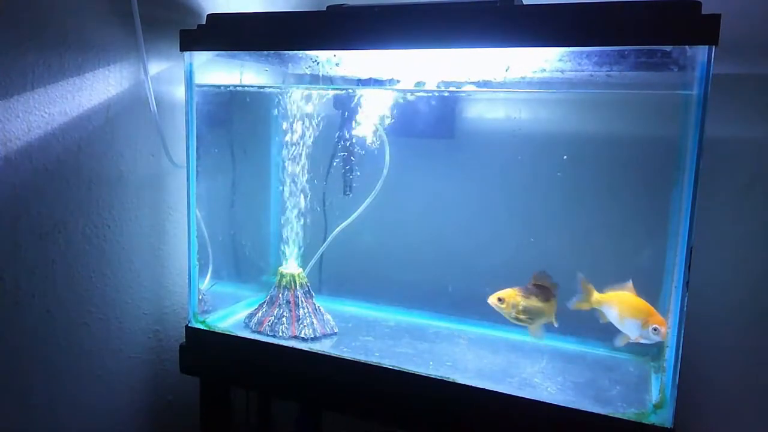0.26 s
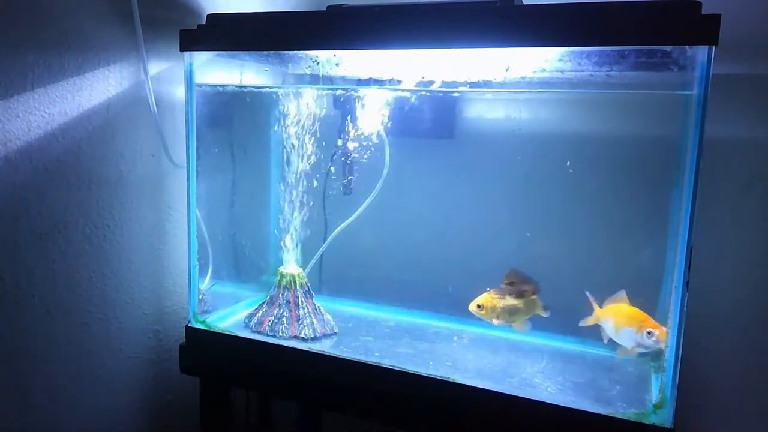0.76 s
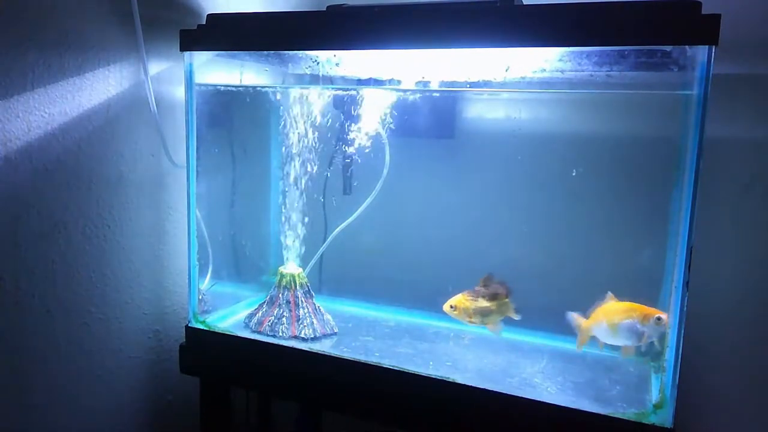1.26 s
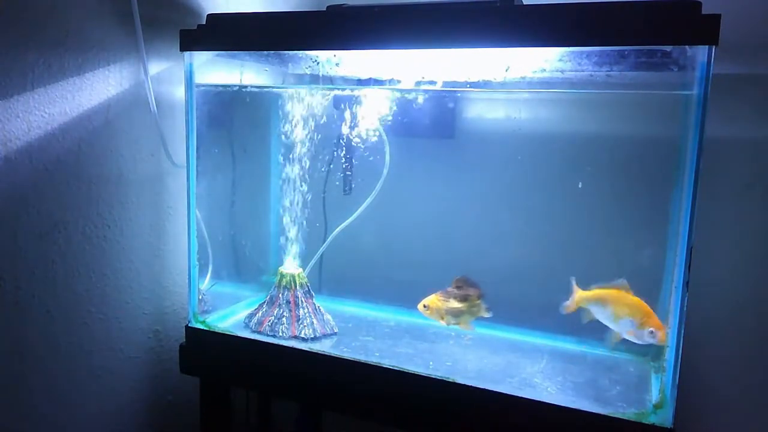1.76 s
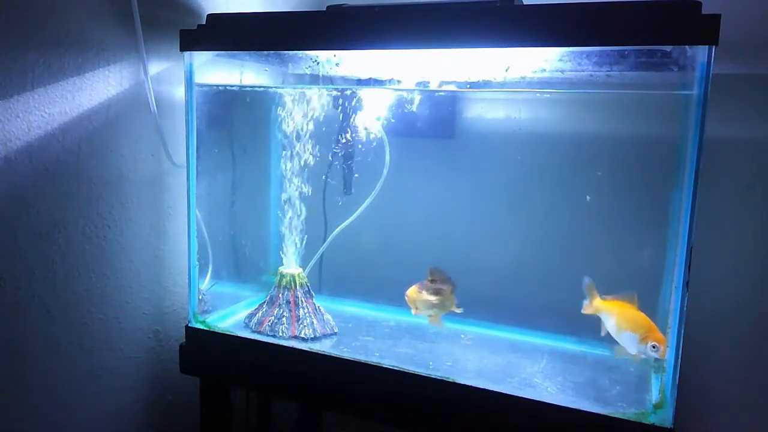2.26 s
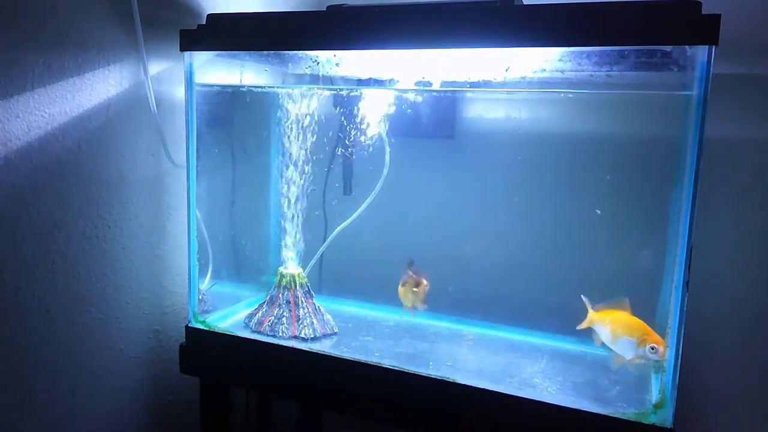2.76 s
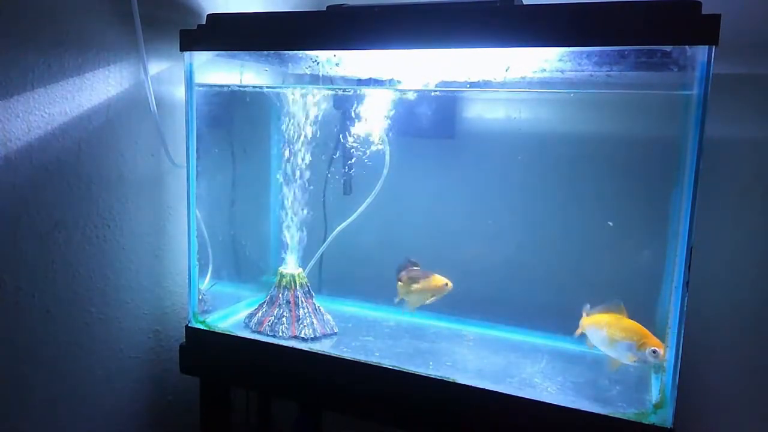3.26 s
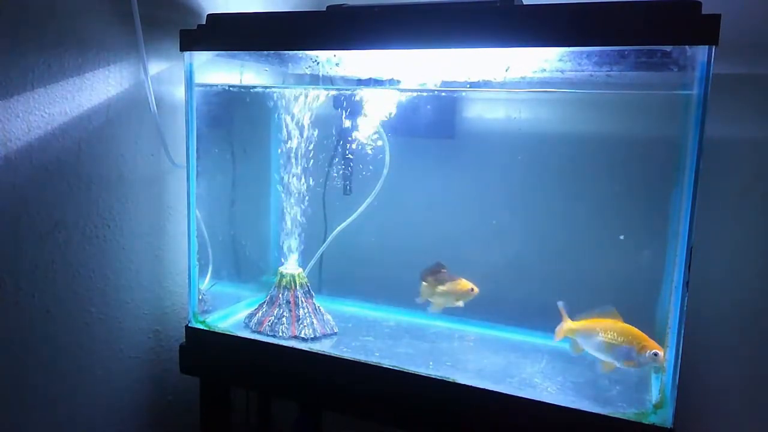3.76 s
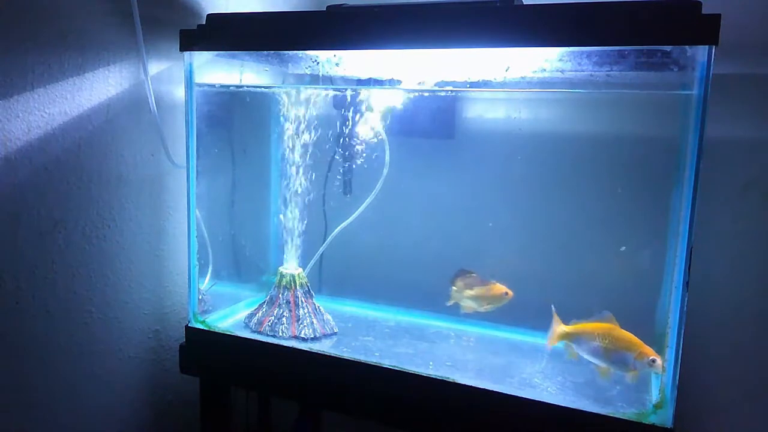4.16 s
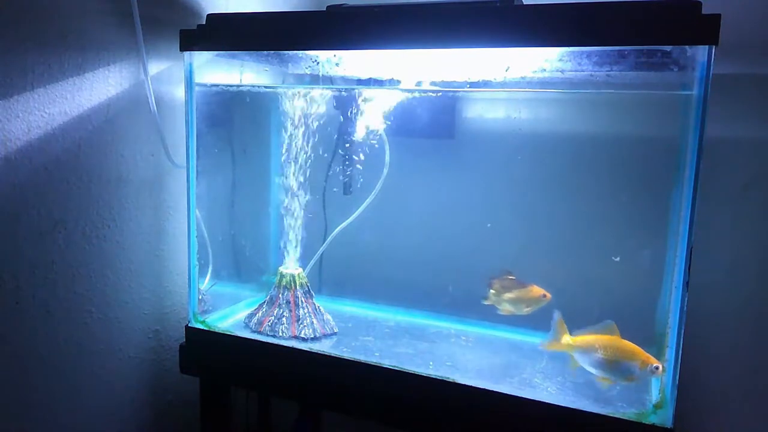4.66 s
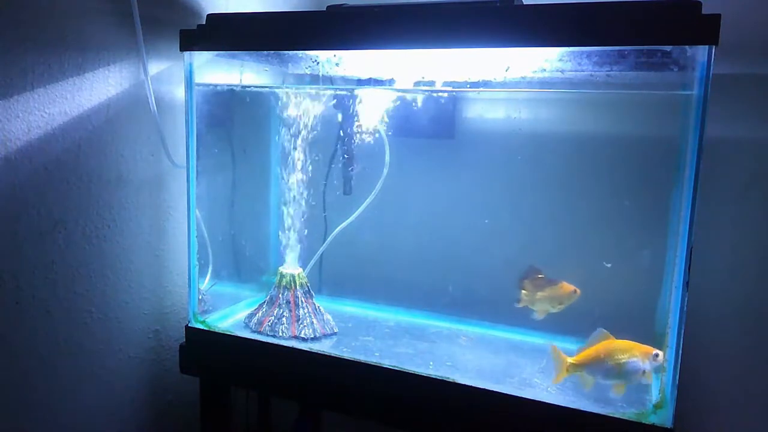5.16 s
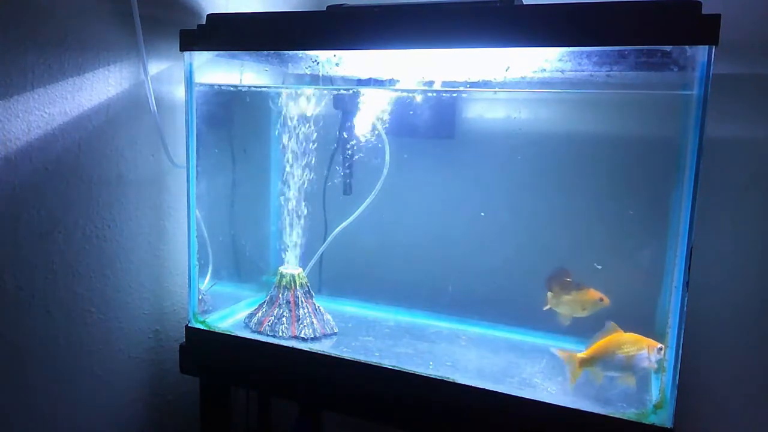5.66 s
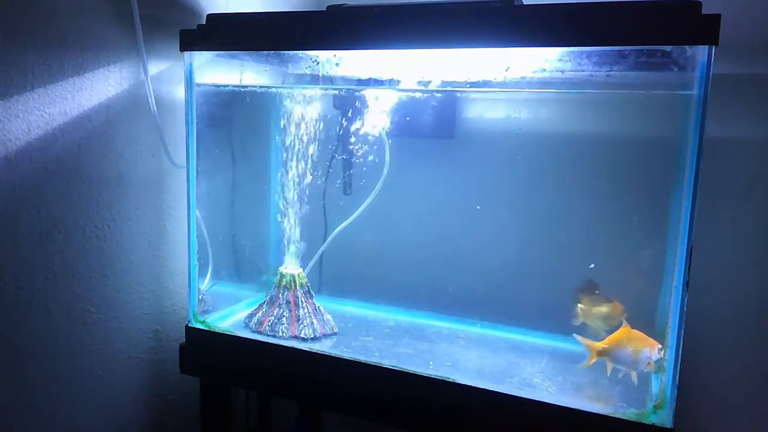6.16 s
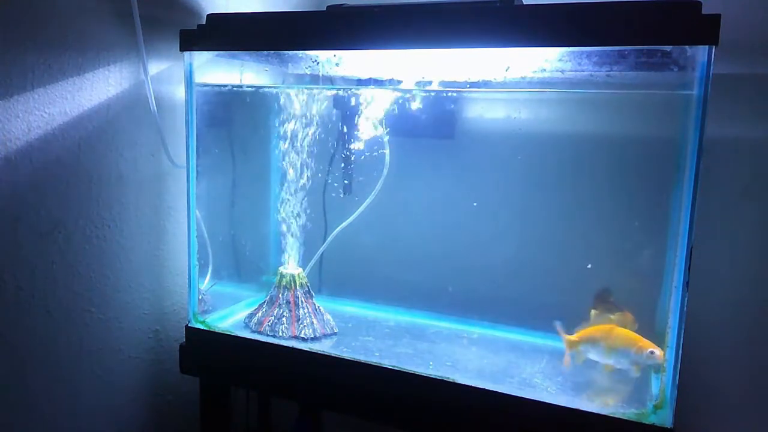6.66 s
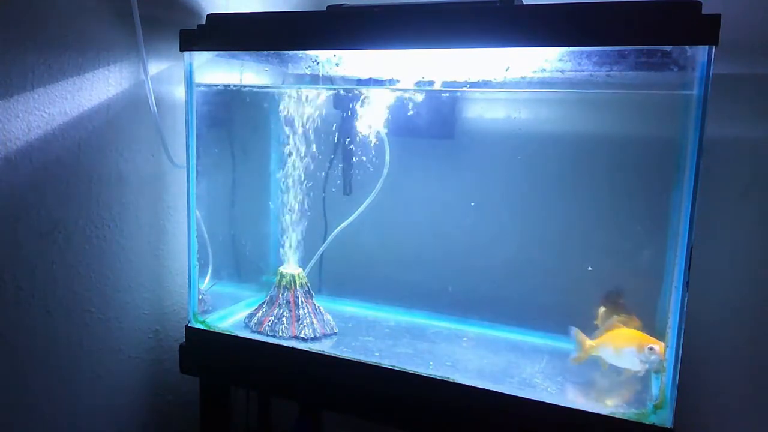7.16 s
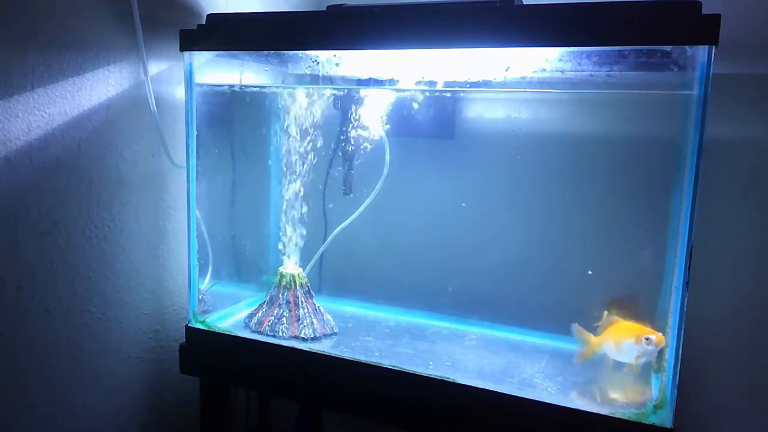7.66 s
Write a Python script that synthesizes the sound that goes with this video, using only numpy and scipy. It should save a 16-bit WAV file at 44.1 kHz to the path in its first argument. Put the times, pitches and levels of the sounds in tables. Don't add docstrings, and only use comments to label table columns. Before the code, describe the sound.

Steady low electric pump hum lies under irregular bubbling from an aquarium. Small watery pops, bright ticks, short hollow knocks near one kilohertz and tiny hissing droplets arrive in bursts separated by calmer gaps, becoming busiest in the last two seconds. Very faint thin whistles of air in the hose slip between them. The place is a quiet room with short echo; the microphone is near the tank, slightly muffled on top.

```python
import sys
import numpy as np
from scipy import signal
from scipy.io import wavfile
from scipy.ndimage import uniform_filter1d

SR = 44100
rng = np.random.default_rng(int(sys.argv[2]) if len(sys.argv) > 2 else 0)


def volts_from_decibels(level):
    exponent = np.asarray(level, float) / 20
    return 10 ** exponent


def dump(signal):
    limited = np.clip(np.atleast_2d(signal).T, -1, 1)
    pcm = np.round(limited * 32767).astype(np.int16)
    wavfile.write(sys.argv[1], SR, pcm)


N = 348213

HUM_OVERTONES = [(1, 1.64), (2, -.98), (3, -.81)]
HUM_LEVELS = [-43.5, -66, -61]
# pitch in Hz, strength in dB per Hz.
RUMBLE_SPECTRUM = [(4, -5.5), (12, 5), (30, -2), (50, 1.5), (75, -6.5), (100, -6), (160, -9.5),
                   (220, -15.5), (300, -58.5)]
# pitch in Hz, peak in dB, time to fall 60 dB in seconds, phase in radians.
STAND_WOBBLE = (16.84, -32.5, 6.0, -.55)
# pitch in Hz, strength in dB per Hz.
FIZZ_SPECTRUM = [(140, -20), (230, 1.5), (400, -4.5), (750, -8.5), (1050, -9.5), (1700, -15.5),
                 (2800, -15.5), (3800, -22.5), (5000, -19), (6500, -16), (8000, -16), (9000, -32.5)]
# pitch in Hz, width in Hz, level in dB.
LID_RESONANCES = [(616, 260, -8), (830, 150, -7.5), (995, 130, 16.5), (1050, 140, 7.5), (1200, 330, -5.5),
                  (1300, 51, -23)]
# pitch in Hz, throb depth from 0 to 1, level
# in dB.
WHISTLE_KINDS = [
    (5350, 1, -66.5),
    (2800, 0, -70),
]
# start in seconds, length in seconds.
CRICKET_CHIRPS = [
    (.08, .08),
    (.27, .12),
    (.47, .08),
    (.67, .08),
    (.87, .08),
    (3.07, .08),
    (3.275, .08),
    (5.31, .24),
]
# start in seconds, length in seconds.
LOW_WHISTLES = [
    (1.94, .22),
    (2.47, .08),
    (4.03, .37),
    (4.45, .1),
    (5.05, .18),
    (5.55, .15),
    (6.47, .06),
    (7.68, .08),
]
# start in seconds, peak in dB, pitch in Hz, length in seconds.
NOTES = [(0.098, -57.5, 944, 0.076), (0.327, -56.5, 1223, .07), (0.702, -45, 1010, 0.048),
         (0.932, -42.5, 1054, 0.053), (1.503, -44.5, 1092, 0.044), (2.805, -46.5, 1084, 0.14),
         (4.288, -51, 1080, 0.048), (4.32, -51, 980, .06), (4.351, -44.5, 974, 0.029),
         (4.398, -50, 896, 0.051), (4.443, -50, 1184, 0.11), (4.966, -51, 1052, 0.08),
         (6.75, -40, 991, 0.06), (7.468, -47, 1055, 0.069), (7.735, -47, 1140, 0.038)]
# start in seconds, peak in dB, pitch in Hz.
TICKS = [(0.4994, -55, 2070), (1.3907, -53.5, 2800), (2.5217, -48.5, 3200), (3.5425, -54, 2780),
         (3.8074, -33, 2280), (4.364, -64.5, 2760), (4.9294, -39.5, 2440), (5.298, -51.5, 2680),
         (6.424, -53, 3080), (6.5535, -45.5, 2830), (6.612, -67, 3200), (6.6708, -41, 3070),
         (6.76, -54, 2880), (6.934, -41.5, 3240), (6.964, -46, 2230), (7.0677, -40.5, 3190),
         (7.2236, -45, 2270), (7.256, -45, 2400), (7.3027, -45, 2150), (7.4555, -45, 2130),
         (7.509, -53, 2830)]
# start in seconds, peak in dB, pitch in Hz.
KNOCKS = [(1.2915, -58, 1200), (2.962, -31, 1310), (3.0587, -41, 1260), (3.1186, -42.5, 1370),
          (3.26, -53, 1380), (3.3546, -31.5, 1210), (3.7438, -39, 1260), (5.1106, -44, 1230),
          (5.2577, -45, 1360), (6.4036, -46.5, 1410), (6.5316, -39, 1270), (6.596, -45, 1360),
          (6.9318, -33, 1340), (7.0694, -58, 1370)]
# start in seconds, peak in dB, pitch in Hz.
SPRITZES = [(1.0844, -68, 6640), (1.1523, -62, 6400), (1.483, -63, 5900), (1.7983, -61.5, 5560),
            (2.933, -68, 5500), (3.3554, -60.5, 5710), (3.4366, -52.5, 6750), (3.691, -63, 5930),
            (3.729, -65.5, 5660), (3.8147, -48.5, 6740), (4.6548, -61.5, 6700), (4.9143, -45, 5970),
            (4.9464, -52, 5680), (5.0553, -63, 6300), (5.224, -61, 6910), (5.2596, -54, 7000),
            (5.2944, -59, 6050), (5.3406, -62, 6830), (6.2422, -60.5, 6340), (6.356, -61, 6670),
            (6.4597, -51.5, 6900), (6.562, -57, 5620), (6.604, -65, 6440), (6.648, -65.5, 5790),
            (6.945, -56, 5740), (7.0517, -58.5, 6100), (7.123, -55, 6200), (7.283, -59.5, 7190),
            (7.453, -59, 6700), (7.5646, -62, 7000)]
# start in seconds, strength in dB.
GURGLES = [(.698, -55), (0.909, -69), (0.936, -59), (1.105, -62.5), (1.916, -57.5), (2.19, -66),
           (2.36, -63), (2.71, -50.5), (2.802, -53), (2.844, -59), (2.896, -53), (3.261, -50.5),
           (3.674, -82.5), (3.714, -51), (4.034, -53), (4.292, -68), (4.36, -54), (4.447, -56.5),
           (4.736, -52), (5.053, -47.5), (5.107, -54), (5.205, -57.5), (5.553, -55), (5.689, -51),
           (6.161, -54), (6.834, -51), (7.417, -46), (7.738, -53.5), (7.805, -57)]
# start in seconds, strength in dB, snap over gurgle in dB, snap pitch in Hz.
DRY_POPS = [(0.752, -54, -1, 2900), (1.291, -50, -3, 2370), (1.511, -57, 9, 3160), (1.65, -38.5, 3, 2580),
            (2.963, -41.5, -14.5, 1870), (3.419, -62, -13, 2240), (3.506, -37, -9, 2610),
            (3.745, -58.5, 8.7, 2820), (3.886, -59, 5, 2600), (3.967, -47.5, -11, 2100),
            (4.325, -54, -3.5, 2790), (5.137, -46.5, -8, 2170), (6.266, -43.5, -7.5, 2300),
            (6.405, -52.5, 4.5, 3110), (6.529, -37.5, -7, 2780), (6.696, -46, -12, 2370),
            (6.717, -37.5, -6.5, 2200), (6.74, -43, -7.5, 1950), (6.867, -43, -8, 2850),
            (6.942, -34.5, -6, 2300), (7.048, -38, -3, 2370), (7.148, -43, -3.5, 2330),
            (7.315, -38.5, -11.5, 2150), (7.481, -43.5, -8.5, 2460)]
# start in seconds, strength in dB, snap over gurgle in dB, snap pitch in Hz.
WET_POPS = [(1.185, -67, 13, 2700), (1.35, -46, -1, 2920), (1.481, -51.5, 13, 2800), (2.93, -49, 5.5, 3260),
            (3.061, -61, -5, 2550), (3.118, -48, -0.5, 3080), (3.353, -45, 4, 2760), (3.397, -42, -9, 2270),
            (3.43, -38, 3, 3100), (3.453, -34.5, 2.5, 2580), (3.61, -53, 0.5, 2690),
            (3.785, -54, -12, 2600), (3.806, -30.5, -7.5, 2400), (4.893, -45, -3, 3220),
            (4.912, -45.5, 6.5, 3230), (4.984, -47.5, -6.5, 2780), (5.22, -42, -6, 2540),
            (5.256, -38, -1, 2450), (5.577, -43, -9, 2630), (5.671, -53.5, 0, 2760),
            (6.352, -57, 4.5, 2780), (6.455, -40.5, -1.5, 3000), (6.598, -45, -3.5, 3030),
            (6.639, -37, -6.5, 3100), (6.895, -44.5, -4.5, 2010), (7.121, -43.5, 3, 2500),
            (7.185, -36.5, -0.5, 2480), (7.433, -44.5, -6.5, 2160), (7.553, -43.5, -11.5, 2130),
            (7.615, -51.5, -5.5, 1850)]
# start in seconds, peak in dB, pitch in Hz.
THUMPS = [(1.481, -41, 210), (1.647, -42, 640), (2.963, -36.5, 570), (3.116, -57.5, 315),
          (3.352, -36.5, 255), (3.452, -36.5, 533), (3.514, -42.5, 258), (3.814, -35.5, 204),
          (4.911, -42.5, 208), (5.253, -47.5, 540), (6.266, -50, 206), (6.53, -43, 620),
          (6.715, -40.5, 212), (6.942, -41.5, 422), (7.045, -49.5, 475), (7.183, -39.5, 250),
          (7.312, -50, 635)]
# pitch in Hz, time to fall 60 dB in seconds.
ROOM_DECAY = [(250, 0.5), (1000, 0.2), (3000, 0.22), (7000, 0.23)]
# pitch in Hz, gain in dB.
MICROPHONE = [(20, 1), (3300, -1), (4000, -6.5), (4500, -18.5), (5000, -21.5), (5500, -15), (7000, -14.5),
              (7900, -21), (8500, -26.5), (9500, -72.5)]

MAINS_HZ, RUMBLE_DB, FIZZ_DB = 59.98, -50.5, -58
THROB_HZ = 24
FROTH_PER_S = 700
CALM_DB, SWARM_DB, STIR_DB = -73.5, -11.5, -31.5
GATHER_S, SCATTER_S, STIR_S = .002, .03, .12
WET_SPRAY_DB, DRY_SPRAY_DB = -22, -33
WET_TOP_HZ, DRY_TOP_HZ = 5030, 3530
GURGLE_SNAP_DB, GURGLE_SPRAY_DB, GURGLE_HZ = -12, -26.5, 2430
KICK = 8
PLOP_WIDTH_HZ, PLOP_DB = 26, 38


def evened(x):
    return x / np.sqrt(np.mean(x ** 2) + 1e-20)


def read(points, hz):
    f, value = np.transpose(points)
    return np.interp(np.log(hz + 1), np.log(f + 1), value)


def add(mix, s, sound):
    part = mix[round(s * SR):][:len(sound)]
    part += sound[:len(part)]


def resonate(x, hz, width):
    return signal.lfilter(*signal.iirpeak(min(hz, 9000), hz / width, SR), x)


def band(x, lo_hz, hi_hz, order):
    return signal.sosfilt(signal.butter(order, [lo_hz, hi_hz], "band", fs=SR, output="sos"), x)


def noise(spectrum, size, patchy_db, flicker_db):
    frames, hz = 4 * N // size + 5, np.fft.rfftfreq(size, 1 / SR)
    a, b, patches = rng.standard_normal((frames, len(hz), 3)).T
    patches = uniform_filter1d(patches, size=9, axis=0)
    patches = evened(uniform_filter1d(patches, size=12, axis=1))
    flicker = evened(uniform_filter1d(rng.standard_normal(frames), size=5))
    level_db = read(spectrum, hz)[:, None] + patchy_db * patches + flicker_db * flicker
    z = (a + 1j * b) * volts_from_decibels(level_db)
    return evened(signal.istft(z, nperseg=size, noverlap=3 * size // 4)[1][:N])


def pump():
    turn = 2 * np.pi * MAINS_HZ * np.arange(N) / SR
    hum = np.zeros(N)
    for (multiple, phase), db in zip(HUM_OVERTONES, HUM_LEVELS):
        hum += np.sqrt(2) * volts_from_decibels(db) * np.cos(multiple * turn + phase)
    return hum + volts_from_decibels(RUMBLE_DB) * noise(RUMBLE_SPECTRUM, size=8192, patchy_db=.3, flicker_db=.2)


def stand():
    hz, db, t60, phase = STAND_WOBBLE
    t = np.arange(N) / SR
    return volts_from_decibels(db - 60 * t / t60) * np.cos(2 * np.pi * hz * t + phase)


def fizz():
    return volts_from_decibels(FIZZ_DB) * noise(FIZZ_SPECTRUM, size=512, patchy_db=1.0, flicker_db=1.07)


def thickness():
    s, db, snap_db, _ = np.transpose(WET_POPS + DRY_POPS)
    t = np.arange(0, N, 64) / SR
    lag = t[:, None] - s
    swarm = np.exp(-abs(lag) / np.where(lag < 0, GATHER_S, SCATTER_S))
    stir = np.exp(-(lag / STIR_S) ** 2)
    pop_strength = volts_from_decibels(db + 0.36 * snap_db)
    level = volts_from_decibels(CALM_DB) + (volts_from_decibels(SWARM_DB) * swarm + volts_from_decibels(STIR_DB) * stir) @ pop_strength
    return np.interp(np.arange(N) / SR, t, level)


def froth():
    size = volts_from_decibels(3.3 * np.minimum(rng.exponential(1, N), 2.5))
    size *= rng.random(N) < FROTH_PER_S / SR
    kind, t, out = rng.integers(0, 24, N), np.arange(1500) / SR, np.zeros(N)
    for k, hz in enumerate(np.geomspace(300, 7500, num=24)):
        grain = np.sin(2 * np.pi * hz * t) * np.exp(-t * hz / 4.0) * (1 - np.exp(-t * hz / 0.66))
        colour_db = read([(300, -7.0), (1000, -6.5), (1600, -8.5), (2800, -2.5), (7500, -8)], hz)
        out += signal.oaconvolve(size * (kind == k), volts_from_decibels(colour_db) * evened(grain))[:N]
    out += volts_from_decibels(-3.5) * sum(volts_from_decibels(g) * resonate(out, f, w) for f, w, g in LID_RESONANCES)
    return thickness() * evened(out)


def whistles():
    out = np.zeros(N)
    for rows, (hz, depth, db) in zip((CRICKET_CHIRPS, LOW_WHISTLES), WHISTLE_KINDS):
        for s, length in rows:
            air = resonate(resonate(rng.standard_normal(SR), hz, 50), hz, 50)
            air = air[-round(length * SR):]
            t = np.arange(len(air)) / SR
            air = .7 * evened(air) + np.sin(2 * np.pi * hz * t)
            throb = np.clip(.7 - depth * np.cos(2 * np.pi * THROB_HZ * t), .1, 1)
            add(out, s, volts_from_decibels(db) * evened(air) * throb * signal.windows.tukey(len(air), .1))
    return out


def ring(db, hz, length, rise, attack):
    t = np.arange(round(4 * length * SR)) / SR
    shape = (1 - np.exp(-t / attack)) * np.exp(-t / length)
    return volts_from_decibels(db) * shape / shape.max() * np.sin(2 * np.pi * hz * (t + rise * t ** 2))


def tick(db, hz, width, t60):
    t = np.arange(3000) / SR
    puff = rng.standard_normal(len(t)) * volts_from_decibels(-60 * t / t60)
    puff = resonate(resonate(puff, hz, width), hz, width)
    return volts_from_decibels(db) * puff / abs(puff).max()


def pop(db, snap_db, spray_db, snap_hz, top_hz):
    t = np.arange(8000) / SR
    start = t == 0
    burst = np.minimum(t / .0004, 1) * (1 + .8 * np.exp(-t / .003))
    uneven = evened(uniform_filter1d(rng.standard_normal(len(t)), size=150)) * np.minimum(t / 0.02, 1)
    tear = rng.standard_normal((3, len(t))) * volts_from_decibels(3.6 * uneven)

    lid = tear[0] * np.minimum(t / 0.006, 1) * volts_from_decibels(-60 * t / 0.058)
    jolted = lid + KICK * start
    lid = volts_from_decibels(-4.5) * lid
    for hz, width, gain_db in LID_RESONANCES:
        lid = lid + volts_from_decibels(gain_db + 0.64 * rng.standard_normal()) * resonate(jolted, hz, width)
    plop_hz = rng.uniform(943, 1122)
    lid = lid + volts_from_decibels(PLOP_DB) * resonate(1. * start, plop_hz, PLOP_WIDTH_HZ)

    shreds = tear[1] * burst * volts_from_decibels(-60 * t / 0.084)
    daughters = sum(resonate(shreds, f, 120) for f in rng.uniform(2000, 3500, size=4))
    snap = resonate(shreds, snap_hz, 330) + volts_from_decibels(-4) * daughters + volts_from_decibels(-1.5) * shreds
    spray = tear[2] * np.minimum(t / 0.0097, 1) * volts_from_decibels(-60 * t / 0.082)

    lid = band(lid, 700, 1450, order=3)
    snap = band(snap, 1750, top_hz, order=3)
    spray = band(spray, 5000, 9500, order=3)
    out = np.zeros(len(t))
    for part, level_db in (lid, -6), (snap, snap_db - 5.5), (spray, spray_db + 5.5):
        out += volts_from_decibels(db + level_db) * part / np.sqrt(np.mean(part[:500] ** 2))
    return out


def thump(db, hz):
    t = np.arange(6000) / SR
    puff = band(rng.standard_normal(len(t)) * volts_from_decibels(-60 * t / 0.053), 93, 600, order=2)
    note = ring(db - 11, hz, 0.0081, rise=0.96, attack=0.018)
    puff *= volts_from_decibels(db - 12.5) / np.sqrt(np.mean(puff[:800] ** 2))
    add(puff, 0, note)
    return puff


def bubbles():
    out = froth()
    wet = WET_POPS, WET_SPRAY_DB, WET_TOP_HZ
    dry_kind = DRY_POPS, DRY_SPRAY_DB, DRY_TOP_HZ
    for rows, spray_db, top_hz in (wet, dry_kind):
        for s, db, snap_db, hz in rows:
            add(out, s, pop(db, snap_db, snap_db + spray_db, hz, top_hz))
    for s, db in GURGLES:
        add(out, s, pop(db, GURGLE_SNAP_DB, GURGLE_SPRAY_DB, GURGLE_HZ, WET_TOP_HZ))
    for s, db, hz in THUMPS:
        add(out, s, thump(db, hz))
    for s, db, hz in TICKS:
        add(out, s, tick(db - 0.5, hz, width=1300, t60=0.12))
    for s, db, hz in KNOCKS:
        add(out, s, tick(db - 5.5, hz, width=430, t60=0.066))
    for s, db, hz in SPRITZES:
        add(out, s, tick(db + 13.5, hz, width=1700, t60=0.082))
    for s, db, hz, length in NOTES:
        add(out, s, ring(db - 7, hz, length * 0.26, rise=.3, attack=0.014))
    return out


def room(x):
    count = SR // 2
    taps = np.zeros((3, count))
    slots = np.arange(200, count - 20, 20)
    at = slots + rng.integers(0, 20, (3, len(slots)))
    np.put_along_axis(taps, at, rng.choice([-1., 1.], at.shape), 1)
    hz, t, z = signal.stft(taps, SR, nperseg=256)
    fade = volts_from_decibels(-60 * t / read(ROOM_DECAY, hz)[:, None])
    tails = signal.istft(z * fade, SR, nperseg=256)[1]
    turn = 2 * np.pi * (7 * np.arange(N) / SR + np.arange(3)[:, None] / 3)
    feeds = x * np.cos(turn) * np.sqrt(2 / 3)
    return signal.fftconvolve(feeds, tails / np.linalg.norm(tails[0]), axes=1)[:, :N].sum(0)


def scene():
    water = bubbles()
    echo = volts_from_decibels(-5.5) * room(water)
    return (water + echo + fizz() + whistles() + pump() + stand())[None]


def band_limit(x):
    return signal.sosfilt(signal.butter(12, 8500, fs=SR, output="sos"), x)


def record(dry):
    log_gain = read(MICROPHONE, abs(np.fft.fftfreq(4096, 1 / SR))) * np.log(10) / 20
    taps = np.fft.ifft(np.exp(np.conj(signal.hilbert(log_gain)))).real[:2048]
    running = np.pad(dry, ((0, 0), (len(taps) - 1, 0)), "edge")
    mix = signal.oaconvolve(running, taps[None], "valid", axes=1)
    return band_limit(mix)


dry = scene()
out = record(dry)
dump(out)
```